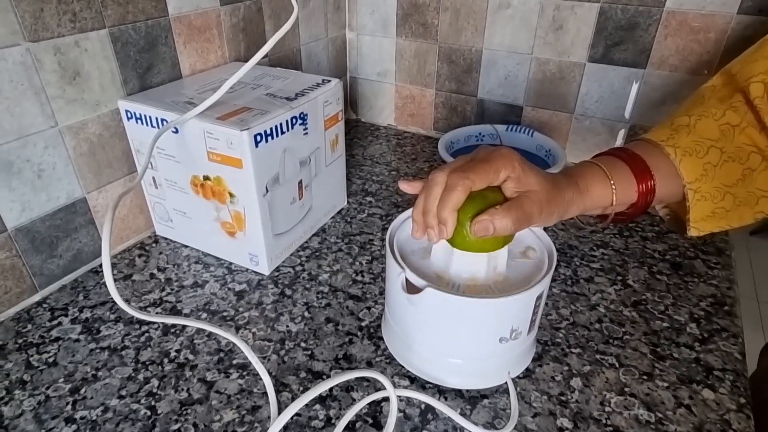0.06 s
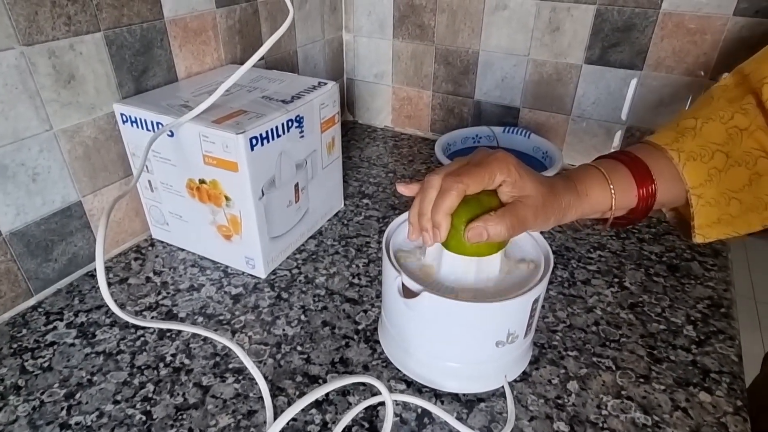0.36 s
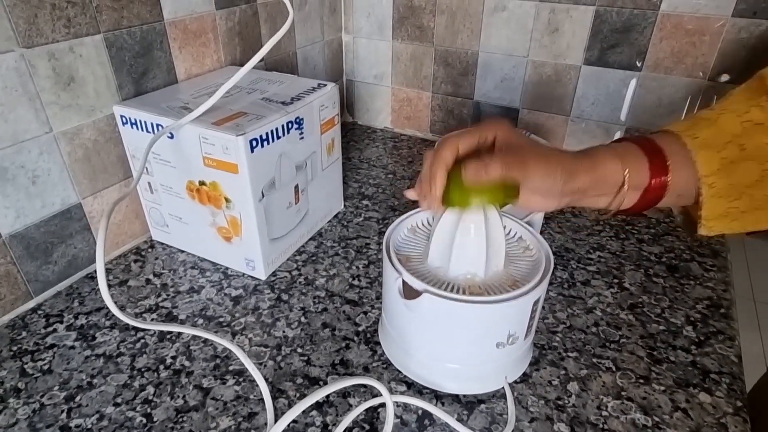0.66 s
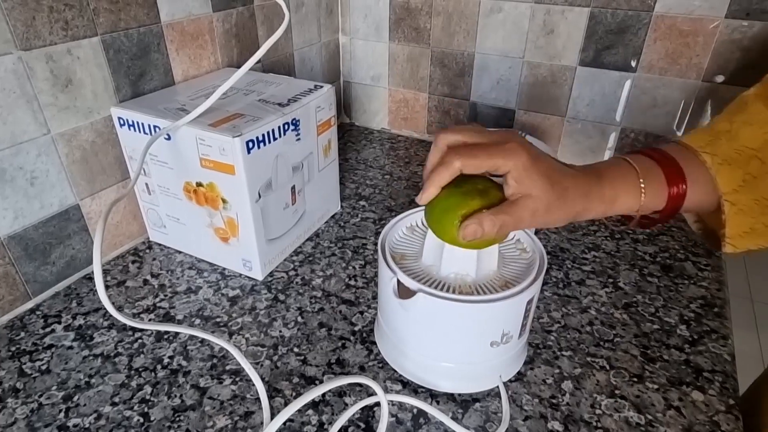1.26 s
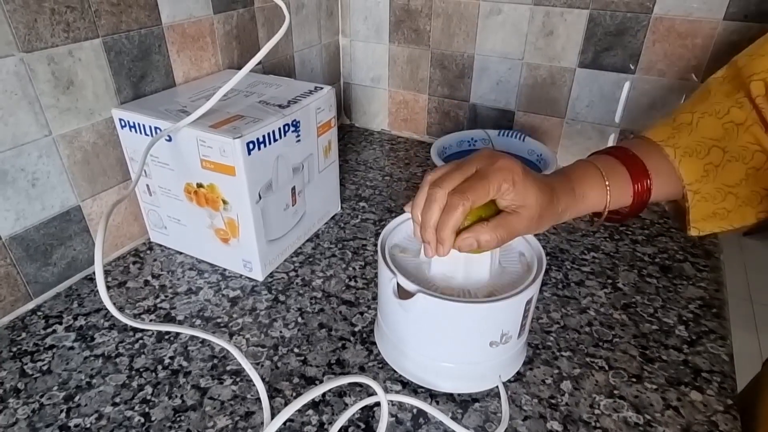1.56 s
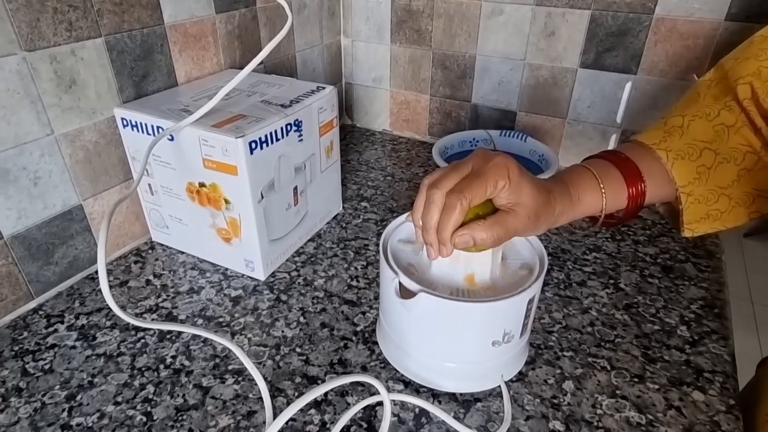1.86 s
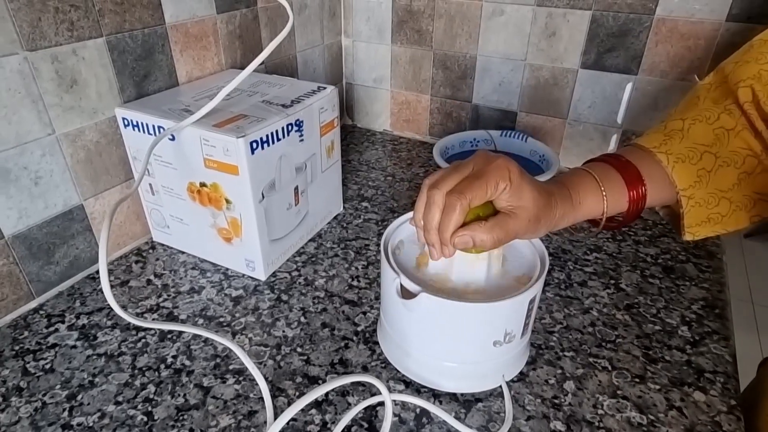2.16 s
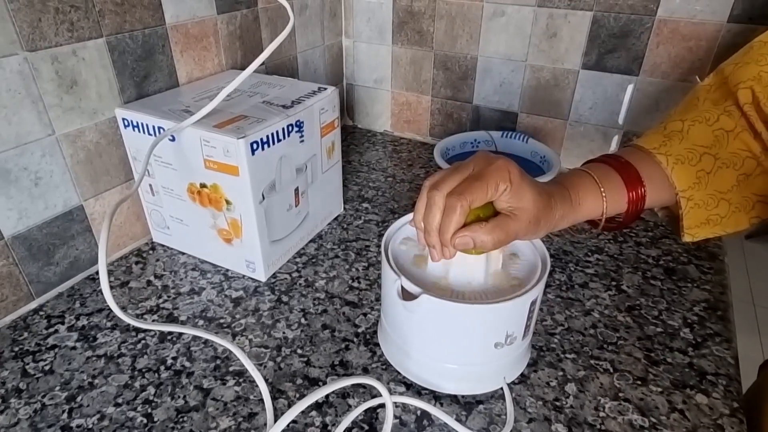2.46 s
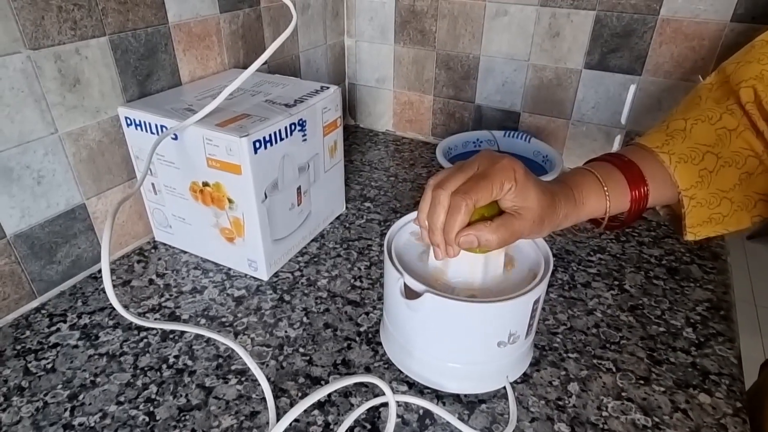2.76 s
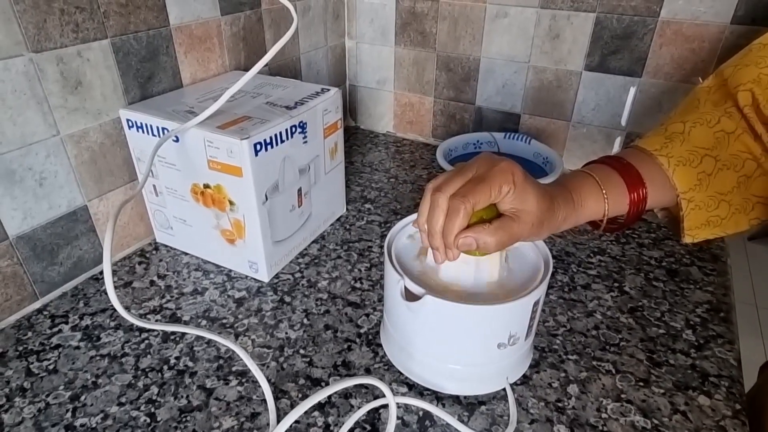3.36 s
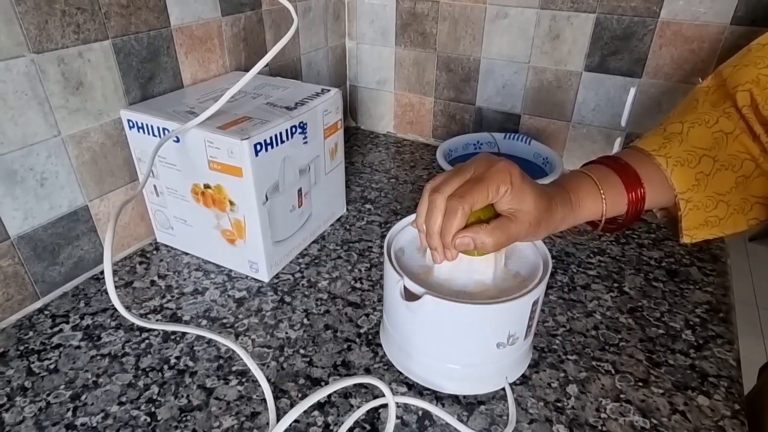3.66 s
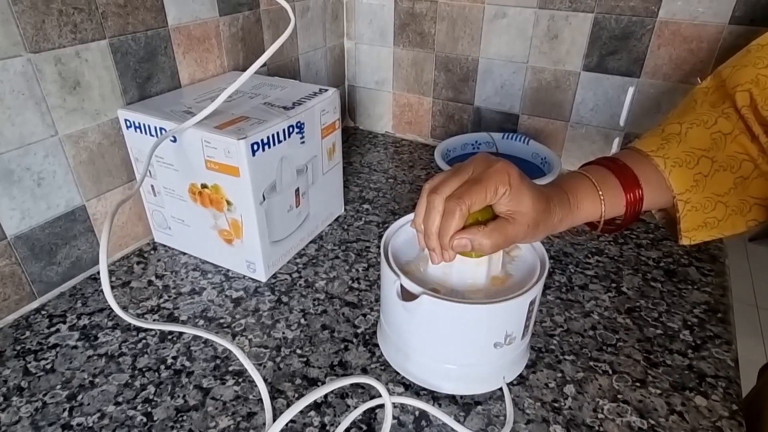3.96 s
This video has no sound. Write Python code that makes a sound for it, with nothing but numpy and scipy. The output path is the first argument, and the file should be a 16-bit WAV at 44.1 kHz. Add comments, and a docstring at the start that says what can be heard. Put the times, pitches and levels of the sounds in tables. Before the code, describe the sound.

Electric juicer motor whirring against a fruit half, pausing for a moment, then running again.

```python
"""A tiled kitchen, one microphone close to an electric citrus juicer on the stone counter.
Its mains-locked motor hums; plastic gears knock, rattle and whirr in the housing. The fruit half is
lifted, the gears run light and stop; it is pressed on again, the drive catches with a clunk and the
pulp crackles. In the pause bangles clink over a low room hum and a faint motor whine from far off.
The walls answer the nearby sounds."""
import sys
import numpy as np
from scipy import signal
from scipy.fft import rfft, irfft, next_fast_len
from scipy.io import wavfile
from scipy.ndimage import map_coordinates

SR = 44100
rng = np.random.default_rng(int(sys.argv[2]) if len(sys.argv) > 2 else 0)


def materialize(psi):
    """Save the field psi as 16-bit PCM at rate SR to the path in sys.argv[1].

    A 1-D psi becomes a single channel; in a 2-D psi each row is a channel.
    """
    bounded = np.clip(np.atleast_2d(psi).T, -1, 1)
    quanta = np.round(bounded * 32767).astype(np.int16)
    wavfile.write(sys.argv[1], SR, quanta)


N = 176400

# Close up, the juicer. Shaft speed (time [s], speed [share of full])
SHAFT_SPEED = [(0, 1), (.45, 1), (.58, .99), (.64, .88), (.8, .5), (1.5, .7), (1.56, .97), (1.6, 1), (4, 1)]
# how hard the drive works (time [s], level [dB])
DRIVE_LEVEL = [(0, -1), (.33, 1), (.37, -7), (.42, 1), (.6, -3.5), (.625, -7.5), (.70, -17.5), (.85, -89),
               (1.49, -44), (1.512, -12), (1.53, 0), (1.75, 0.5), (3, 0.5), (4, 0)]
# mains hum of the motor (time [s], level [dB])
HUM_LEVEL = [(0, 1.5), (.36, -0.5), (.5, -8), (.63, -1.5), (.67, -24), (.75, -66), (1.49, -71), (1.535, 1),
             (1.6, -5), (1.7, 1), (4, 1)]
# motor orders: the first four hum, the rest colour the knocks (multiple [of turn rate], level [dB])
MOTOR_ORDERS = [(2, 1), (4, -15.5), (7, -16), (8, -6.5), (9, -15), (10, -3), (11, 1.5), (12, -10), (13, 2),
                (14, 3), (15, -.5), (16, 0), (17, -2), (18, -20), (19, -18.5), (20, -4.5)]
# housing as the gear teeth ring it (frequency [Hz], gain [dB])
HOUSING_RING = [(30, -26.5), (130, -9.5), (170, -16), (230, -19.5), (340, -6.5), (420, -12.5), (540, 5.5),
                (700, -2.5), (950, 1.5), (1080, -9), (1240, -2.5), (1330, 3), (1450, 0.5), (1580, -3),
                (1700, 1), (1950, 1), (2300, -2.5), (2650, -8), (3020, -12), (3300, -3), (3800, -19.5),
                (4100, -10), (4500, -18.5), (5000, -20), (5800, -21.5), (6600, -29), (8300, -44.5),
                (16000, -50.5)]
# gears running light as the hand lets go (time [s], level [dB])
UNLOADED_LEVEL = [(0, -2.5), (.36, -4), (.44, -0.5), (.595, 3.5), (.618, -3), (.68, -18), (.73, -24),
                  (.79, -65)]
# ring of the unloaded gears (frequency [Hz], gain [dB])
UNLOADED_RING = [(100, -53), (450, -6), (640, -3.5), (740, -30.5), (860, 4), (930, -16), (1000, 12),
                 (1130, -21), (1370, 6.5), (1560, -20), (1750, -3.5), (2450, 0.5), (2750, -34), (3900, -35),
                 (4200, -12), (5200, -22), (8000, -46), (16000, -62)]
# surges of the gear whirr, on top of the drive level (time [s], level [dB])
WHIRR_LEVEL = [(.3, -25.5), (.6, -31.5), (2.15, -36.5), (2.5, -27), (2.6, -35.5), (2.9, -28), (2.99, -25.5),
               (3.15, -38), (3.35, -28), (3.55, -27), (3.8, -32)]
# tones of that whirr (frequency [Hz], level [dB])
GEAR_TONES = [(1395, -3), (3270, -16), (4130, -20)]
# gears letting go, then catching (time [s], level [dB], brightness [dB per octave])
GEAR_CLUNKS = [(.595, -13, -4.5), (.606, -12, -1), (.654, -18.5, -7.5), (.682, -31, -4), (1.511, -21, -3.5),
               (1.5225, -13.5, 0), (1.5302, -5.5, -5.5), (1.5435, -10, -2.5), (1.547, -11, 4.5),
               (1.563, -14.5, 2)]
# ring of each clunk (frequency [Hz], gain [dB])
CLUNK_BODY = [(60, -36), (300, -29), (540, -20), (730, -31), (800, 0), (850, 9), (910, 2.5), (985, 1),
              (1070, -2.5), (1450, -25), (1600, 0.5), (1790, 3.5), (2200, -13), (2450, -5.5), (2850, -20),
              (3260, -9), (3800, -11), (4280, -15.5), (5000, -23), (6000, -22.5), (8300, -49.5),
              (16000, -58)]
# At the cone. Wet ticks of pulp and peel (time [s], level [dB])
PULP_TICKS = [(0.0433, -39), (0.073, -40), (.1481, -45), (2.1241, -43), (2.3242, -45), (2.616, -37),
              (3.1683, -50), (3.8986, -40.5)]
# colour of ticks and bursting cells (frequency [Hz], gain [dB])
TICK_SPECTRUM = [(1000, -36), (4000, -20), (6000, 23.5), (8500, 8.5), (12000, 3), (16000, -15)]
# juice spitting from under the peel (time [s], level [dB])
JUICE_SPITS = [(.042, -44), (1.702, -43), (2.863, -41)]
# how wetly the pulp grinds (time [s], level [dB])
PULP_WETNESS = [(0, 2), (.6, -7), (1.6, -7), (2.3, -0.5), (4, 1)]
# colour of fizz and spits (frequency [Hz], gain [dB])
FIZZ_SPECTRUM = [(3000, -32), (7500, -3), (11500, -11), (13000, 1)]
# soft bump of fruit on cone (frequency [Hz], gain [dB])
TOUCH_SPECTRUM = [(100, -26), (500, 8), (950, 9), (1300, -4), (2600, -22), (3700, -3), (9000, -21),
                  (16000, -43)]
# At the lifted wrist. Bangles touch (time [s], level [dB])
BANGLE_CLINKS = [(1.0595, -64), (1.0964, -58)]
# modes of a bangle (frequency [Hz], level [dB], t60 [s])
BANGLE_MODES = [(5620, 1, 0.049), (11200, -6, 0.09), (14800, -19, 0.11)]
# crack of their contact (frequency [Hz], gain [dB])
CLINK_SPECTRUM = [(2000, -42), (5700, 2), (8000, -11), (15500, 1)]
# Farther off. Decay between the tiled walls (frequency [Hz], t60 [s])
WALL_DECAY = [(100, 0.73), (1000, 0.4), (4000, 0.3), (14000, 0.17)]
# distant motor (time [s], pitch [Hz], level [dB])
DISTANT_WHINE = [(.7, 598, -52), (.84, 597, -58), (.94, 601, -59), (1.06, 601, -58), (1.22, 594, -63),
                 (1.35, 592, -69), (1.48, 602, -72)]
# its harmonics (multiple [of pitch], level [dB])
WHINE_HARMONICS = [(2, 0), (3, -5.5), (4, -6), (5, -16), (6, -18), (7, -24)]
# low hum in the room (frequency [Hz], level [dB])
ROOM_HUM_TONES = [(79, -51), (110, -56.5)]
# steady room noise (frequency [Hz], gain [dB])
ROOM_SPECTRUM = [(20, -28), (45, -23), (80, -10.5), (130, -25.5), (480, -35), (1000, -37), (2700, -45.5),
                 (6500, -56.5), (8500, -71), (15500, -77)]

TURN_HZ, THROB_HZ, THROB_PEAK_S, THROB_DB = 49.93, 6.02, 3.025, 1.04
HUM_DB, KNOCK_DB, RATTLE_DB, UNLOADED_DB = -33.5, -27, -24, -25.5
CRACKLE_DB, FIZZ_DB, TOUCH_DB, ROOM_NOISE_DB = -59.5, -58.5, -41, -51.5
TIME = np.arange(N) / SR


def juicer():
    """One shaft drives motor and gears; returns hum, knocks and rattle."""
    turns = np.cumsum(TURN_HZ * curves(SHAFT_SPEED)[0]) / SR
    gear_turns = turns + .01 * wobble(20)  # the gears lag and lead the shaft
    # the load swells as the ribs of the cone pass through the fruit
    throb = np.cos(2 * np.pi * THROB_HZ * (TIME - THROB_PEAK_S))
    drive = amp(curves(DRIVE_LEVEL)[0] + THROB_DB * throb)
    loaded = amp(RATTLE_DB) * drive * rattle(gear_turns, HOUSING_RING, scatter_db=1, pulsing_db=-.5)
    light = rattle(gear_turns, UNLOADED_RING, scatter_db=2, pulsing_db=3.5)
    light *= amp(UNLOADED_DB + curves(UNLOADED_LEVEL)[0])
    return hum(turns + .0062 * wobble(3.4)), drive * knocks(gear_turns), loaded + light


def hum(turns, waver_db=1.5):
    """The motor's low orders sound as clean, slightly unsteady tones."""
    tones = sum(amp(db + waver_db * wobble(24.8)) * np.sin(2 * np.pi * (k * turns + rng.random()))
                for k, db in MOTOR_ORDERS[:4])
    return np.sqrt(2) * amp(HUM_DB + curves(HUM_LEVEL)[0]) * tones


def knocks(turns, backlash_turns=.024, jitter_s=.000098):
    """The gear play closes twice a turn and knocks the housing; every second knock comes early."""
    count = np.arange(int(2 * turns[-1]))
    second = count % 2
    jitter, scatter_db = rng.standard_normal((len(count), 2)).T
    times = np.interp(count / 2 - backlash_turns * second, turns, TIME) + jitter_s * jitter
    sizes = amp(np.clip(scatter_db, -1.5, 1.5) - .47 * second)
    body = [(200, -34.5), (330, -24)] + [(k * TURN_HZ, db) for k, db in MOTOR_ORDERS[4:]]
    body += [(1080, -17.5), (1170, -9), (1250, -34), (1400, -1.5),
             (1600, -27), (2300, -11), (4000, -27), (8000, -67)]
    return amp(KNOCK_DB) * unit(ring(impacts(times, sizes), body))


def rattle(turns, body, scatter_db, pulsing_db, contacts_per_s=1600):
    """Gear teeth clatter at random, their force varying with two torque pulses a turn."""
    hits = rng.random(N) < contacts_per_s / SR
    force_db = scatter_db * np.clip(rng.standard_normal(N), -2, 2)
    force_db += pulsing_db * np.cos(4 * np.pi * (turns - .04))
    force_db += .6 * wobble(26.37)  # the load wanders
    return unit(ring(hits * rng.choice([-1, 1], N) * amp(force_db), body))


def whirr(roughness_hz=36.27):
    """The loaded gears sing in three rough tones that wander and surge together."""
    drift = 1 + .014 * wobble(10)
    tones = np.zeros(N)
    for hz, db in GEAR_TONES:
        pitch_hz = hz * drift + roughness_hz * wobble(200)
        tones += amp(db) * np.sin(2 * np.pi * np.cumsum(pitch_hz) / SR)
    return np.sqrt(2) * amp(curves(WHIRR_LEVEL)[0] + curves(DRIVE_LEVEL)[0]) * tones


def clunks():
    """The gears clack as the cone is released, and catch in a few quick blows when it is pushed down."""
    out = np.zeros(N)
    for s, db, slope in GEAR_CLUNKS:
        body = [(hz, gain + slope * np.log2(min(hz, 5000) / 1000)) for hz, gain in CLUNK_BODY]
        out += amp(db) * burst(s, body, t60=.047, attack_s=.001, blow=.65)
    return out


def fruit():
    """The fruit is set softly on the cone in the pause; pulp and peel tick while it is pressed."""
    ticks = sum(amp(db) * burst(s, TICK_SPECTRUM, t60=.071, attack_s=.00015) for s, db in PULP_TICKS)
    return ticks + amp(TOUCH_DB) * burst(1.188, TOUCH_SPECTRUM, t60=.074, attack_s=.0054)


def pulp(pops_per_s=40):
    """Juice cells burst in clumps over a wet fizz while the cone turns; now and then the juice spits."""
    clumps = wobble(45)
    pops = (rng.random(N) < pops_per_s / SR * amp(7 * clumps)) * rng.choice([-1, 1], N)
    sizes = amp(4.3 * np.clip(rng.standard_normal(N), -2, 2))
    crackle = amp(CRACKLE_DB) * unit(ring(pops * sizes, TICK_SPECTRUM))
    fizz = amp(FIZZ_DB + 1.5 * clumps) * unit(ring(rng.standard_normal(N), FIZZ_SPECTRUM))
    spits = sum(amp(db) * burst(s, FIZZ_SPECTRUM, t60=.16, attack_s=.005) for s, db in JUICE_SPITS)
    grinding = amp(curves(DRIVE_LEVEL)[0] + curves(PULP_WETNESS)[0])
    return grinding * (crackle + fizz) + spits


def bangles():
    """Two thin bangles clink: a fine crack and a few high modes."""
    out = np.zeros(N)
    for s, db in BANGLE_CLINKS:
        t = np.maximum(TIME - s, 0)
        modes = sum(amp(level - 60 * t / t60) * np.sin(2 * np.pi * hz * t)
                    for hz, level, t60 in BANGLE_MODES)
        crack = amp(10.5) * burst(s, CLINK_SPECTRUM, t60=.045, attack_s=.0004)
        out += amp(db) * (modes + crack)
    return out


def tiled_walls(x):
    """Reflections from the tiles, dying sooner in the treble."""
    hz, t, noise = signal.stft(rng.standard_normal(SR // 2), SR, nperseg=256)
    decay = amp(-60 * t / along(WALL_DECAY, hz)[:, None])
    tail = signal.istft(noise * decay, SR, nperseg=256)[1]
    tail[:SR // 250] = 0  # the first reflection reaches the microphone 4 ms late
    return signal.fftconvolve(x, tail / np.linalg.norm(tail))[:N]


def distant_motor(flutter_db=3.5):
    """A motor whines far off, each harmonic fluttering on its own."""
    pitch_hz, level_db = curves(DISTANT_WHINE)
    phase = 2 * np.pi * np.cumsum(pitch_hz * (1 + .004 * wobble(90))) / SR
    whine = sum(amp(level_db + db + flutter_db * wobble(34.7)) * np.sin(k * phase + 1.4 * wobble(59))
                for k, db in WHINE_HARMONICS)
    return np.sqrt(2) * whine


def room_tone():
    """A beating low hum over steady room noise."""
    drone = sum(amp(db + 2.5 * wobble(15)) * np.sin(2 * np.pi * hz * TIME + .4 * wobble(8))
                for hz, db in ROOM_HUM_TONES)
    return np.sqrt(2) * drone + amp(ROOM_NOISE_DB) * unit(ring(rng.standard_normal(N), ROOM_SPECTRUM))


def burst(start_s, colour, t60, attack_s, blow=0):
    """Chatter dying away in a body; blow is the strength of a sharp first contact over that chatter."""
    t = np.maximum(TIME - start_s, 0)
    shape = amp(-60 * t / t60) * (1 - np.exp(-t / attack_s))
    force = shape * rng.standard_normal(N)
    force[round(start_s * SR)] += blow * np.linalg.norm(shape)
    return unit(ring(force, colour)) * np.sqrt(np.mean(shape ** 2))


def impacts(times, sizes):
    """A train of sharp contacts."""
    at = np.round(times * SR).astype(int)
    inside = (at >= 0) & (at < N)
    return np.bincount(at[inside], sizes[inside], N)


def ring(x, body):
    """Pass x through a causal body given as (frequency [Hz], gain [dB])."""
    m = 2 * next_fast_len(N // 2 + 8192)
    gain = amp(along(body, np.fft.rfftfreq(m, 1 / SR)))
    cepstrum = irfft(np.log(gain), m)
    cepstrum[1:m // 2] *= 2  # fold to minimum phase
    cepstrum[m // 2 + 1:] = 0
    return irfft(rfft(x, m) * np.exp(rfft(cepstrum)), m)[:N]


def along(points, hz):
    """Interpolate (frequency [Hz], value) points on a log axis."""
    knots_hz, values = np.transpose(points)
    return np.interp(np.log(hz + 1), np.log(knots_hz + 1), values)


def curves(rows):
    """One value per sample for each column after the time."""
    times, *columns = np.transpose(rows)
    return [np.interp(TIME, times, column) for column in columns]


def wobble(rate):
    """A smooth random curve, rate knots a second."""
    return map_coordinates(rng.standard_normal(4000), [TIME * rate])


def amp(db):
    """Decibels to gain."""
    return 10 ** (np.asarray(db) / 20)


def unit(x):
    """Scale to rms 1."""
    return x / np.sqrt(np.mean(x ** 2) + 1e-20)


def scene():
    """At the microphone: juicer, fruit and bangles up close, walls and background behind."""
    motor, knocking, rattling = juicer()
    clatter = knocking + rattling + whirr() + clunks() + fruit() + pulp() + bangles()
    walls = tiled_walls(amp(-7.5) * clatter)
    return (motor + clatter + walls + distant_motor() + room_tone())[None]


def record(dry):
    """The recorder keeps nothing above 15.8 kHz."""
    m = next_fast_len(N + SR // 2)
    in_band = np.fft.rfftfreq(m, 1 / SR) < 15800
    return irfft(rfft(dry, m) * in_band, m)[:, :N]


dry = scene()
out = record(dry)
materialize(out)
```